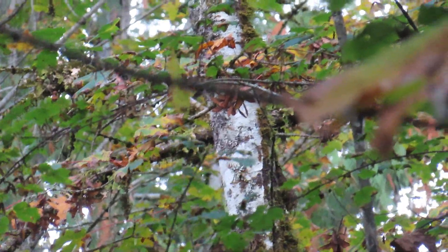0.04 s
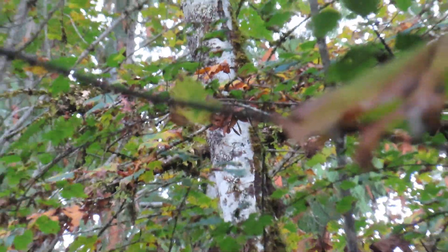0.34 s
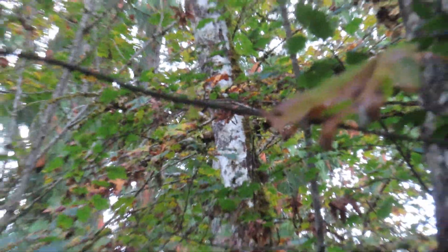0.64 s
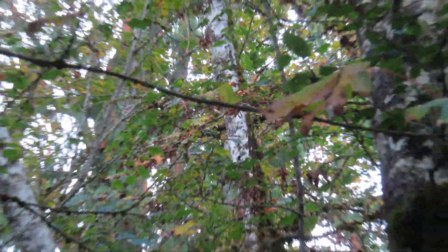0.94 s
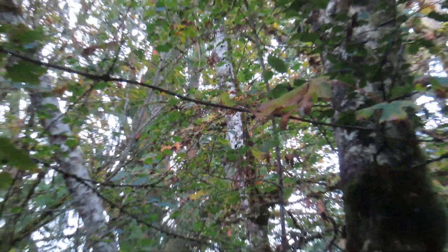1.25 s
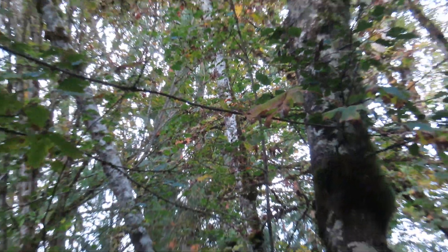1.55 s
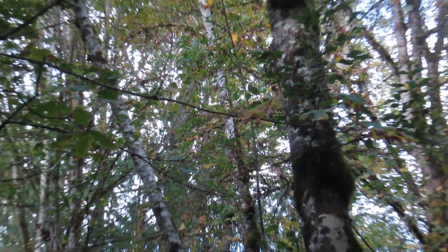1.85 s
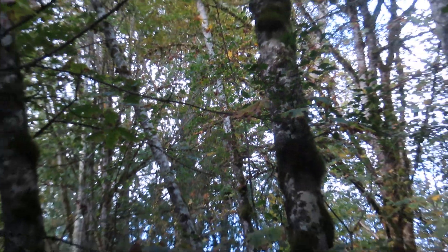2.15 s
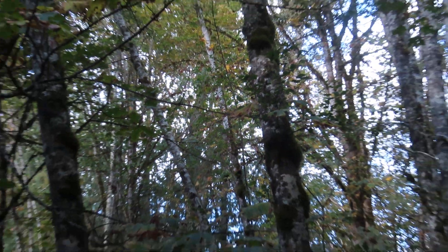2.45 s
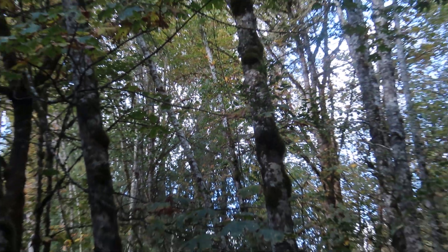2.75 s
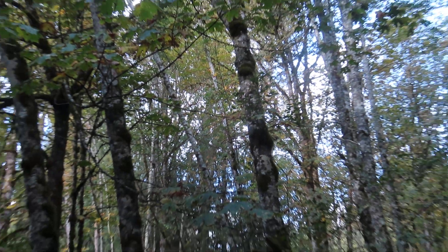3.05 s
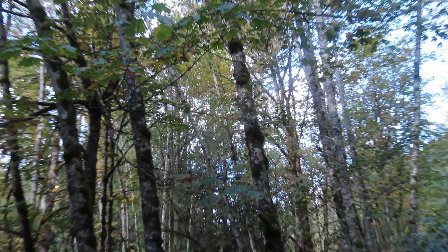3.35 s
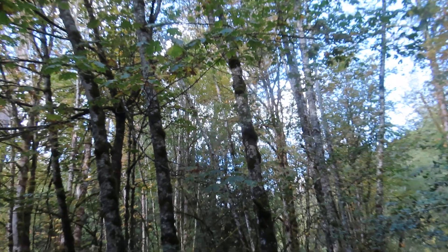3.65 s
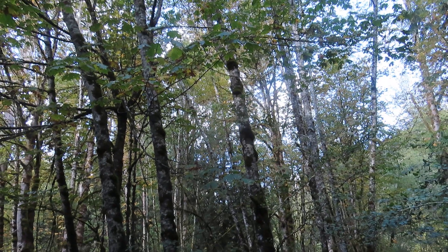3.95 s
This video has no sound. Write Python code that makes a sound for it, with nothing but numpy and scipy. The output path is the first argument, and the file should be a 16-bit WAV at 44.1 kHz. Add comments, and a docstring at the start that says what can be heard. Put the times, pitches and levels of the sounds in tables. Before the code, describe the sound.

A steady far wash, like wind in treetops, with soft handling bumps in a quiet wood.

```python
"""A steady far wash, like wind in the treetops or distant traffic, fills a quiet wood and sinks after
half a second as a hand-held camera's noise suppressor takes hold. The lens motor buzzes faintly as
it zooms out, its steps tapping the barrel, and short, dry ticks dot the scene. The hand on the
camera makes a low rumble and, in the second half, two runs of soft bumps as the grip slips."""
import sys
import numpy as np
from scipy import signal
from scipy.fft import rfft, irfft
from scipy.io import wavfile
from scipy.ndimage import uniform_filter1d

SR = 44100
rng = np.random.default_rng(int(sys.argv[2]) if len(sys.argv) > 2 else 0)


def bounce(signal):
    """Save signal as a 16-bit WAV file at the path given by the first command-line argument."""
    frames = np.transpose(np.atleast_2d(signal))
    limited = np.clip(frames, -1, 1)
    pcm = np.round(limited * 32767).astype(np.int16)
    wavfile.write(sys.argv[1], SR, pcm)


N = 176400
TIME = np.arange(N) / SR
FREQS = np.arange(N // 2 + 1) * SR / N

# tone colour of the far wash: (frequency [Hz], relative level [dB])
WASH_COLOUR = [(35, -25), (52, -6.5), (75, -1), (110, -5), (190, -2.5), (255, -5.5), (320, -0.5),
               (380, -6.5), (450, -4.5), (600, -5), (1150, -6.5), (1400, -5.5), (1700, -8), (2150, -7.5),
               (2400, -11), (2850, -14), (3400, -15.5), (4150, -18.5), (4600, -21.5), (6200, -23.5),
               (7100, -29), (10000, -33), (13000, -35.5), (15000, -41)]
# stereo width of the wash: (frequency [Hz], side minus mid [dB])
WASH_WIDTH = [(60, -30), (110, -12), (200, -11.5), (350, -8), (650, -17), (1200, -24), (2300, -15),
              (3500, -7.5), (5500, -12.5), (8500, -6.5), (13000, -10)]
# soft bumps of the hand: (peak time [s], relative level [dB], pitch [Hz], ring length [cycles])
HAND_BUMPS = [(0.621, -37, 303, 2), (1.665, -35, 330, 1.9), (1.788, -40, 150, .8), (2.112, -34, 165, 1.3),
              (2.151, -42, 224, 2.1), (2.464, -25.5, 156, 1.25), (2.499, -34, 148, 0.95),
              (2.52, -34, 130, 1.3), (2.572, -29, 135, 1.53), (2.594, -32, 150, 0.87),
              (2.637, -23.5, 135, 0.83), (2.672, -28, 123, 1.43), (2.692, -32, 110, 0.83),
              (2.718, -27, 150, 1.36), (2.757, -33, 105, 1.8), (2.787, -25, 130, 1.28),
              (2.804, -25, 139, 1.4), (2.844, -26, 110, 1.5), (2.864, -28, 119, 1),
              (2.898, -32.5, 108, 1.83), (3.043, -24.5, 169, .9), (3.055, -24, 135, 1.02),
              (3.126, -33, 130, 1.6), (3.175, -29, 111, 0.93), (3.188, -24.5, 125, 0.87),
              (3.202, -33, 105, 1.4), (3.227, -30, 94, 1.55), (3.27, -24, 160, 0.75),
              (3.291, -26, 148, 0.99), (3.353, -20.5, 166, 1.32), (3.421, -22.5, 123, 1.15),
              (3.439, -26.5, 135, .9), (3.473, -19.5, 142, 0.81), (3.553, -35, 65, 0.74)]
# the grip rubbing under the bumps: (start [s], end [s], relative level [dB])
GRIP_RUBS = [(2.45, 2.93, -41.5), (3.1, 3.319, -42), (3.38, 3.52, -43.5)]
# fader curve of the hand's rumble: (time [s], relative level [dB])
RUMBLE_FADER = [(0.05, -61), (0.16, -40), (0.23, -58), (0.33, -42.5), (0.6, -54), (0.8, -72), (0.89, -60),
                (1.5, -70), (1.53, -35.5), (1.62, -46), (2.02, -46), (2.08, -62), (2.46, -47), (2.7, -43.5),
                (3.01, -50), (3.5, -45), (3.64, -66), (3.91, -49), (4.0, -62)]
# short, dry ticks, several probably lens motor clicks: (time [s], relative level [dB], pitch [Hz])
DRY_TICKS = [(.249, -27, 2010), (.399, -27.5, 1560), (.824, -30, 2150), (1.019, -28, 1540),
             (1.346, -26, 1800), (1.498, -41, 2070), (1.543, -33, 2180), (1.723, -35, 1780),
             (1.949, -30, 1890), (2.405, -33, 3200), (3.075, -32.5, 1990), (3.748, -29.5, 1980)]
# resonances of the lens barrel: (frequency [Hz], relative level [dB], time to fall 60 dB [s])
BARREL_MODES = [(818, -68, 0.067), (1350, -53.5, 0.0043), (1860, -52, 0.035), (1977, -53, 0.018),
                (2207, -54, 0.039)]
# the suppressor's cut at a band's median level, before limits: (frequency [Hz], cut [dB])
SUPPRESSOR_CUT = [(100, -0.33), (310, .5), (420, 6), (1000, 6), (2200, 6.5), (4500, 6.5), (8000, 4),
                  (14000, 5.5)]
# how the cut eases as a band gets louder: (frequency [Hz], slope [dB per dB])
SUPPRESSOR_SLOPE = [(280, 0), (450, 1), (1100, 0.76), (2300, 0.91), (5000, 0.54), (9000, .35), (13000, 0.8)]


def far_wash(bed_db=-38.5, settle_s=0.19, waver_db=0.21):
    """The wood's distant bed of noise: narrow in the mids, wider in the treble, a touch to the left."""
    hz = np.maximum(FREQS, 1)
    colour_db = at_hz(WASH_COLOUR, hz)
    mid = shaped_noise(colour_db)
    side = shaped_noise(colour_db + at_hz(WASH_WIDTH, hz))
    stereo = rms_one(np.array([mid + side, delay(mid - side, seconds=26e-6)]))
    opening_lift_db = 1.5 * np.exp(-TIME / settle_s)
    level = from_db(bed_db + opening_lift_db + waver_db * drift(rate_hz=7))
    return pan(level * stereo, left_db=0.63)


def hand_bumps(bump_trim_db=-0.7, rub_fade_s=0.013, right_lead_s=0.0013):
    """Each slip of the grip swells and dies in the camera body within a few cycles, over dull rubbing."""
    body = np.zeros(N)
    for peak_s, db, hz, cycles in HAND_BUMPS:
        spread = np.exp(.5 / cycles)  # a narrower band rings longer
        low, high = hz / spread, hz * spread
        thud = band(band(signal.unit_impulse(N), low, high), low, high)
        thud /= np.abs(thud).max()
        body += from_db(db + bump_trim_db) * np.roll(thud, int(peak_s * SR) - np.abs(thud).argmax())
    rub = rms_one(band(rng.standard_normal(N), low_hz=81, high_hz=200))
    for start, end, db in GRIP_RUBS:
        fade = np.clip(np.minimum(TIME - start, end - TIME) / rub_fade_s, 0, 1)
        body += from_db(db) * fade * rub
    return pan(np.array([body, delay(body, -right_lead_s)]), left_db=4)


def hand_rumble(trim_db=-4):
    """Deep rumble that comes and goes as the camera moves in the hand."""
    fader_db = np.interp(TIME, *np.transpose(RUMBLE_FADER))
    lows = rms_one(band(rng.standard_normal(N), low_hz=30.6, high_hz=64))
    return pan(from_db(fader_db + trim_db) * lows, left_db=3.5)


def dry_ticks(t60_s=0.017, width_octaves=0.95, trim_db=-6.5):
    """Tiny dry ticks that die at once, each a burst of noise around its own pitch."""
    noise, ticks = rng.standard_normal(N), np.zeros(N)
    spread = 2 ** (width_octaves / 2)
    for start, db, hz in DRY_TICKS:
        envelope = (TIME >= start) * from_db(db - 60 * np.abs(TIME - start) / t60_s)
        ticks += envelope * rms_one(band(noise, hz / spread, hz * spread))
    return from_db(trim_db) * ticks


def lens_motor(start_s=.314, step_s=.015, drive_db=4.5, uneven_db=2.5):
    """Evenly timed steps of uneven strength tap the lens barrel into a faint buzz."""
    steps = (np.arange(start_s, TIME[-1], step_s) * SR).astype(int)
    taps = np.zeros(N)
    taps[steps] = from_db(drive_db + uneven_db * rng.standard_normal(N)[steps])
    buzz = sum(from_db(db) * ring(taps, hz, t60) for hz, db, t60 in BARREL_MODES)
    return pan(buzz, left_db=9)


def noise_suppressor(x, from_s=0.434, full_s=0.485, max_cut_db=13, side_share=0.32):
    """Ducks the weak patches of the spectrum most, leaving a grainy, faintly watery, narrower wash."""
    framing = dict(fs=SR, nperseg=768, noverlap=576)
    hz, frame_s, (left, right) = signal.stft(x, **framing)
    mid, side = (left + right) / 2, (left - right) / 2
    power = np.abs(mid) ** 2 + np.abs(side) ** 2
    for axis in (0, 1):  # smooth across frequency, then time
        power = uniform_filter1d(power, size=3, axis=axis)
    power += 1e-20
    over_median_db = 10 * np.log10(power / np.median(power, axis=1, keepdims=True))
    cut_db = at_hz(SUPPRESSOR_CUT, hz + 1)[:, None]
    slope = at_hz(SUPPRESSOR_SLOPE, hz + 1)[:, None]
    engaged = np.clip((frame_s - from_s) / (full_s - from_s), 0, 1)
    gain = from_db(-engaged * np.clip(cut_db - slope * over_median_db, 0, max_cut_db))
    side = side * from_db(-engaged * cut_db * side_share)
    _, ducked = signal.istft(gain * np.array([mid + side, mid - side]), **framing)
    return ducked[:, :N]


def from_db(db):
    """Decibels to gain."""
    return 10 ** (np.asarray(db) / 20)


def rms_one(x):
    """Scale to rms 1."""
    return x / np.sqrt(np.mean(x ** 2) + 1e-20)


def at_hz(points, hz):
    """Read a curve on a log-frequency axis."""
    freqs, values = np.transpose(points)
    return np.interp(np.log(hz), np.log(freqs), values)


def band(x, low_hz, high_hz):
    """Band-pass with 12 dB per octave skirts."""
    return signal.sosfilt(signal.butter(2, [low_hz, high_hz], "band", fs=SR, output="sos"), x + 1e-18)


def shaped_noise(spectrum_db):
    """White noise through an EQ curve."""
    return irfft(rfft(rng.standard_normal(N)) * from_db(spectrum_db), N)


def drift(rate_hz):
    """Smooth random wander of rms 1, mostly slower than rate_hz."""
    return rms_one(irfft(rfft(rng.standard_normal(N)) / (1 + (FREQS / rate_hz) ** 2), N))


def pan(x, left_db):
    """Place a sound by its left-right level difference."""
    return x * from_db([[left_db / 2], [-left_db / 2]])


def delay(x, seconds):
    """Shift in time by any fraction of a sample, wrapping at the ends."""
    return irfft(rfft(x) * np.exp(-2j * np.pi * FREQS * seconds), N)


def ring(clicks, hz, t60):
    """A unit click sets a sine of height 1 ringing."""
    decay, angle = from_db(-60 / (t60 * SR)), 2 * np.pi * hz / SR
    return signal.lfilter([0, np.sin(angle)], [1, -2 * decay * np.cos(angle), decay ** 2], clicks + 1e-18)


def scene():
    """The wood mixed with the camera's own noises."""
    return far_wash() + hand_rumble() + hand_bumps() + lens_motor() + dry_ticks()


def record(dry, open_s=.036, closed_db=-57.5, cutoff_hz=15300):
    """The camera's chain: noise suppressor, an input that opens after an instant, a steep high cut."""
    gate = np.where(TIME < open_s, from_db(closed_db), 1)
    high_cut = signal.ellip(10, .1, 80, cutoff_hz, fs=SR, output="sos")
    return signal.sosfilt(high_cut, noise_suppressor(dry) * gate)


dry = scene()
out = record(dry)
bounce(out)
```